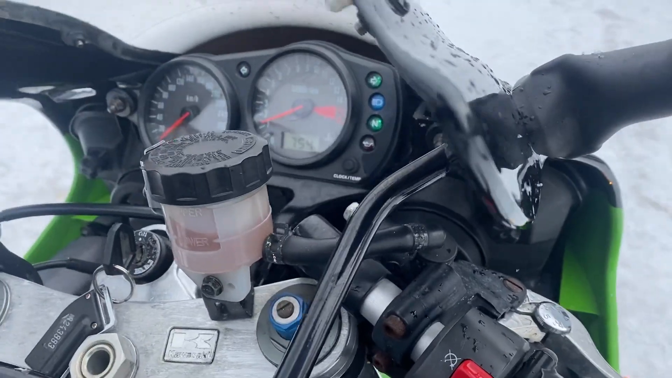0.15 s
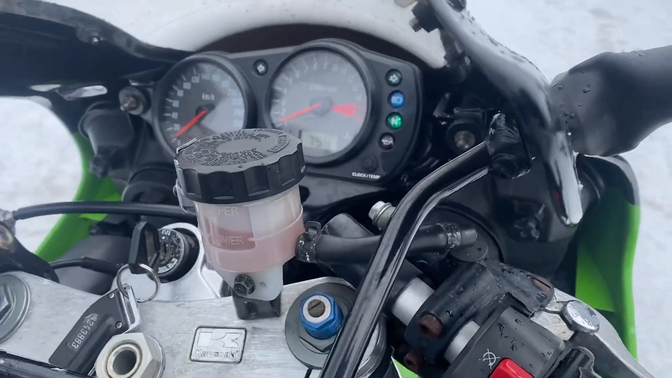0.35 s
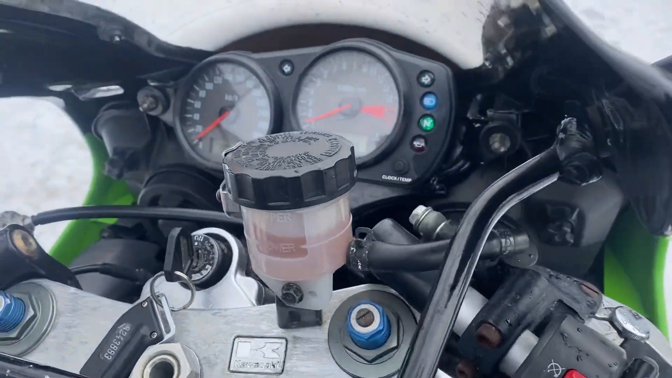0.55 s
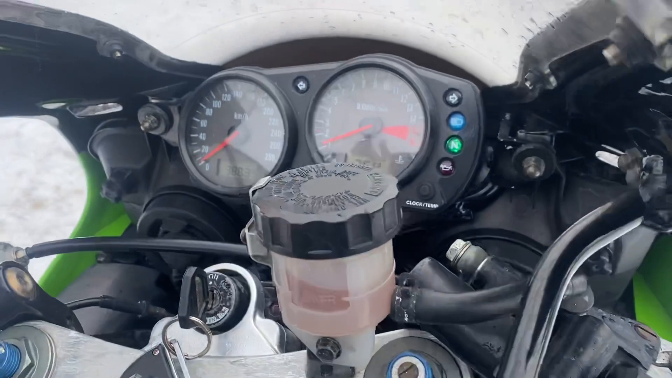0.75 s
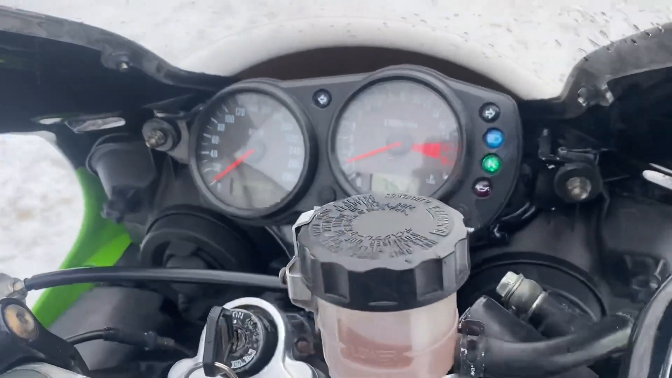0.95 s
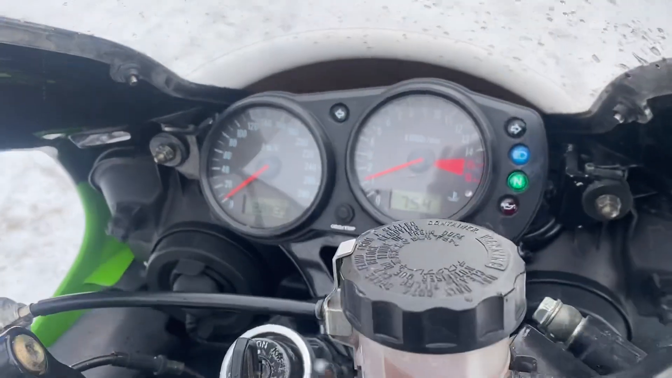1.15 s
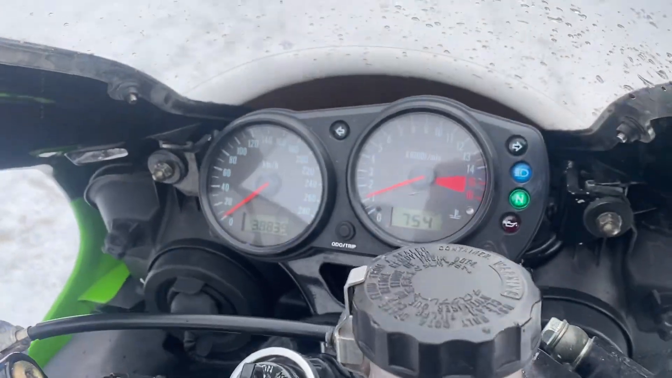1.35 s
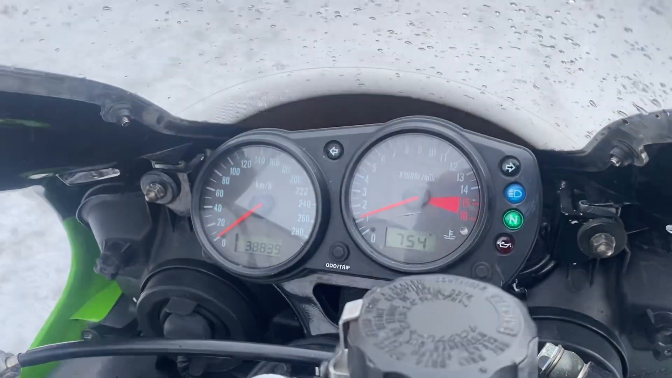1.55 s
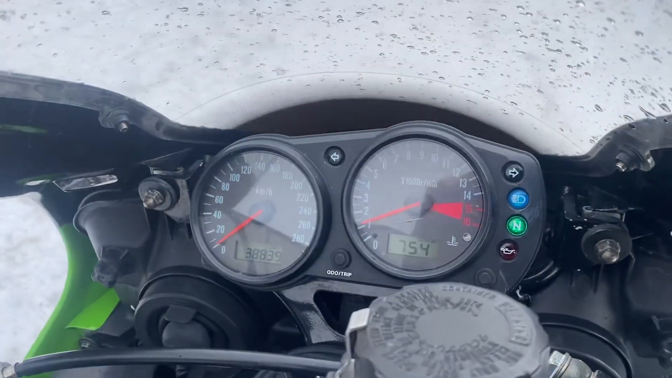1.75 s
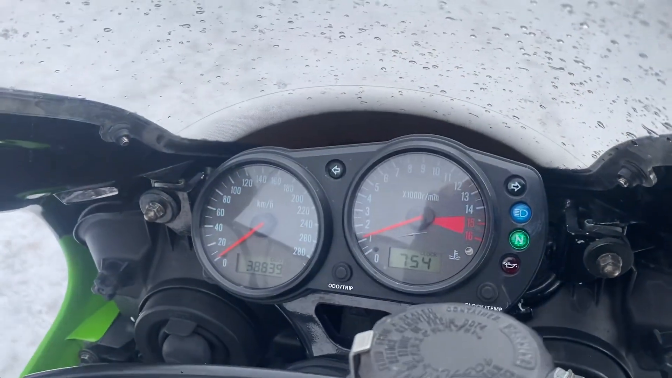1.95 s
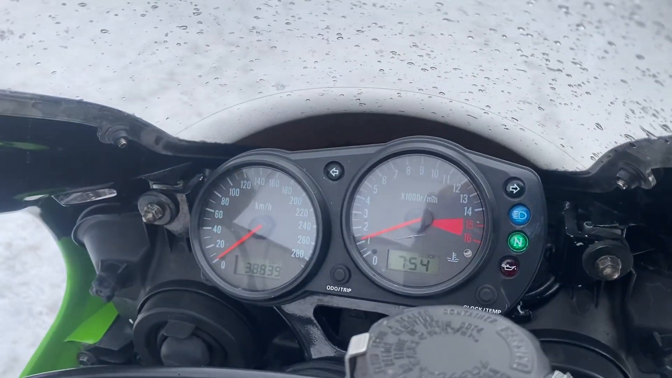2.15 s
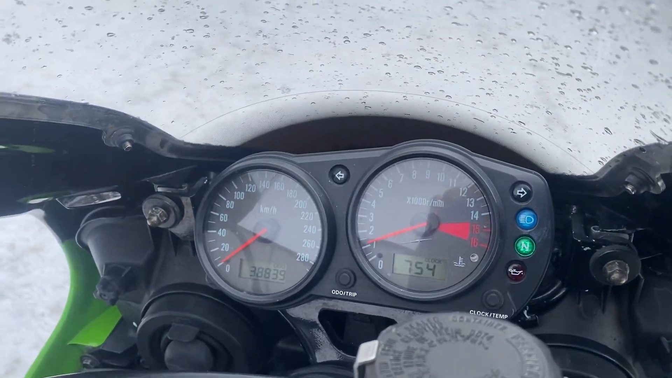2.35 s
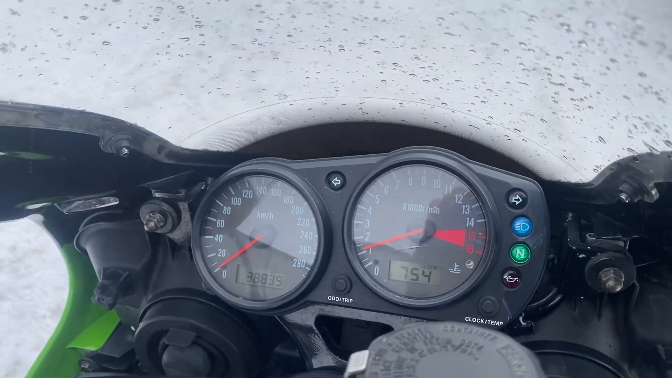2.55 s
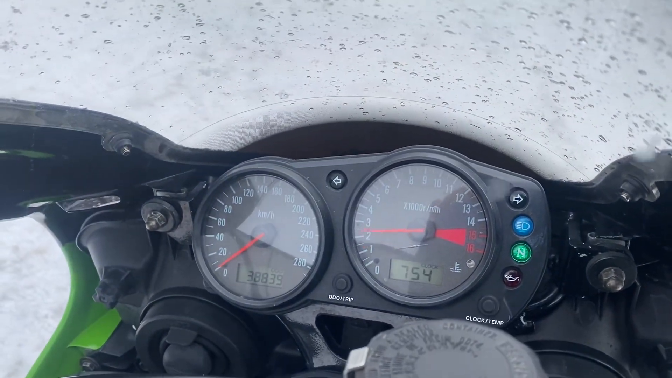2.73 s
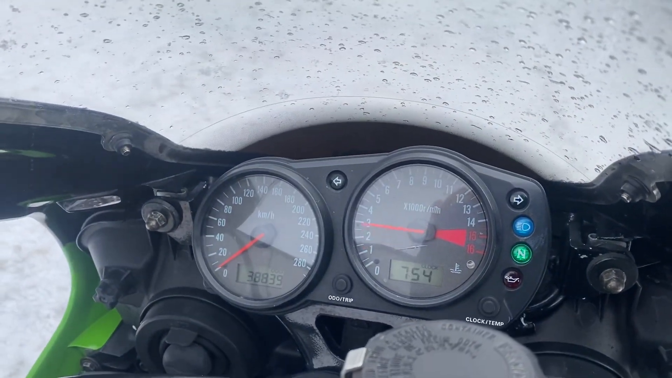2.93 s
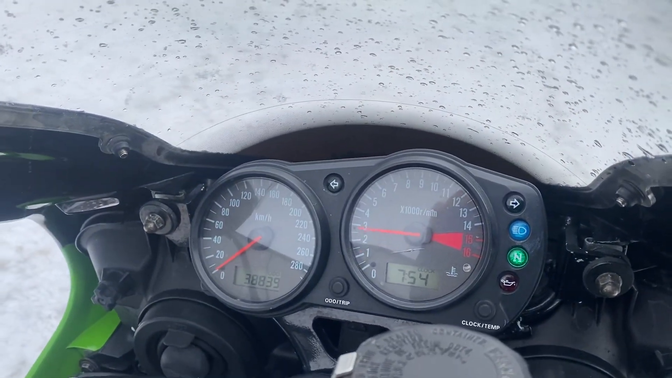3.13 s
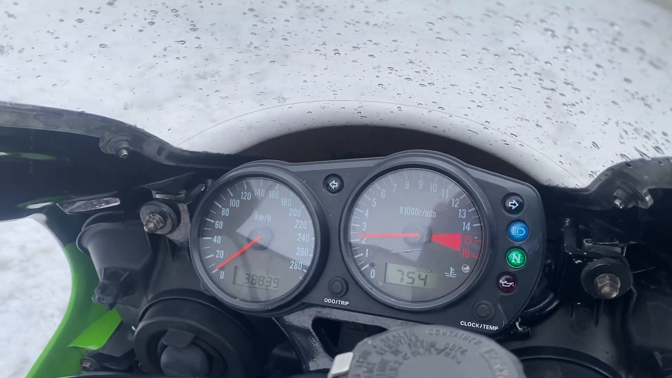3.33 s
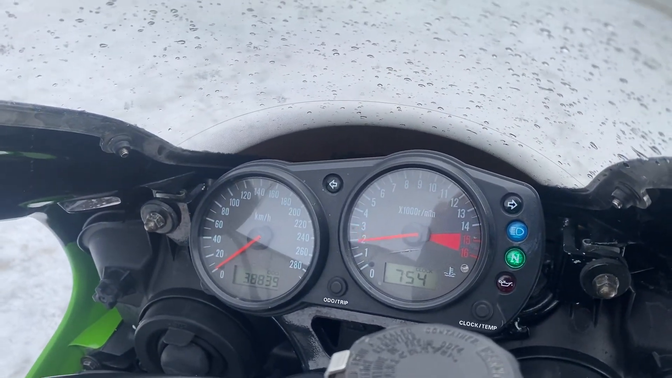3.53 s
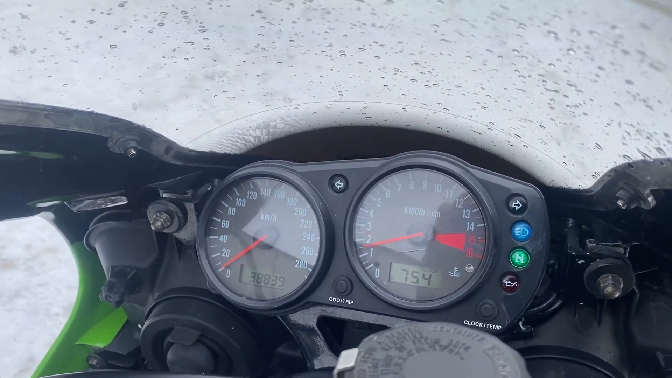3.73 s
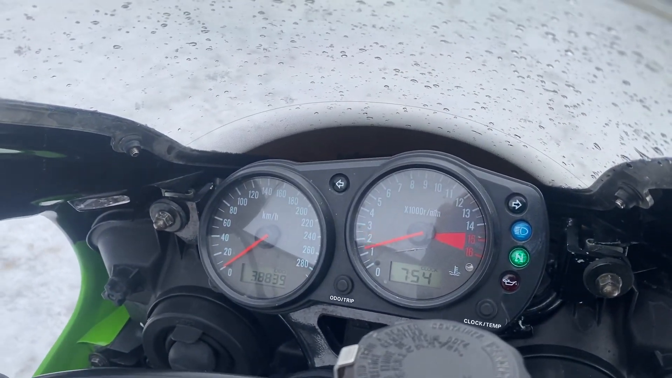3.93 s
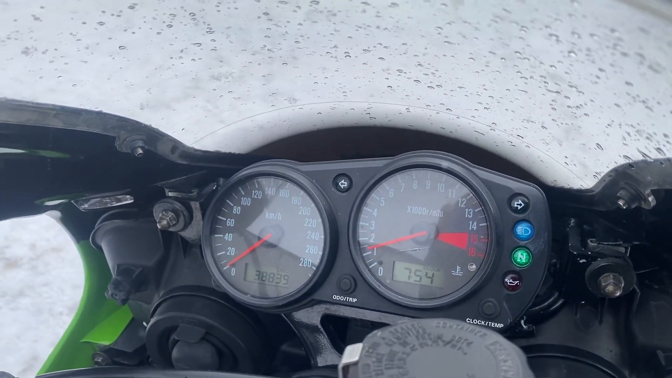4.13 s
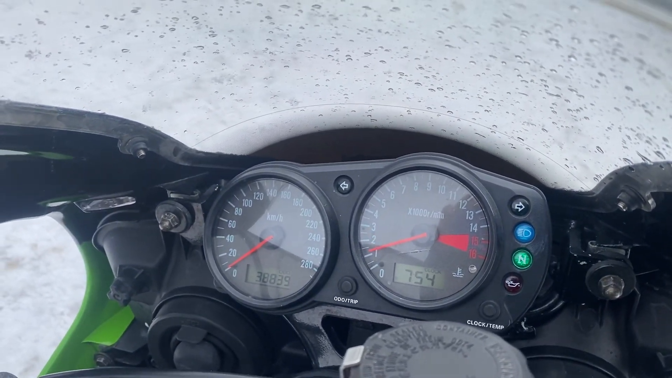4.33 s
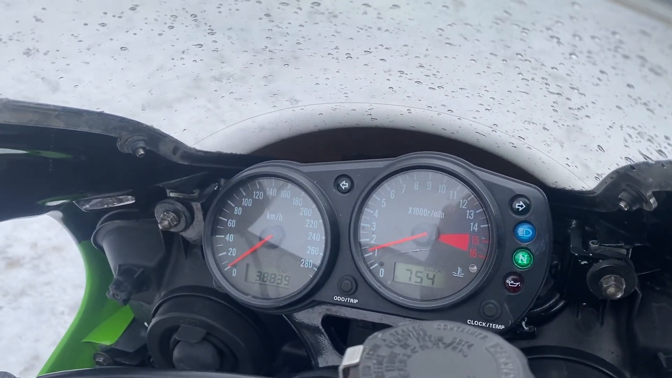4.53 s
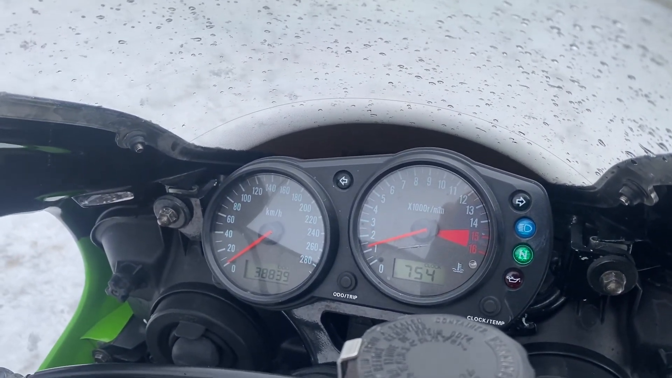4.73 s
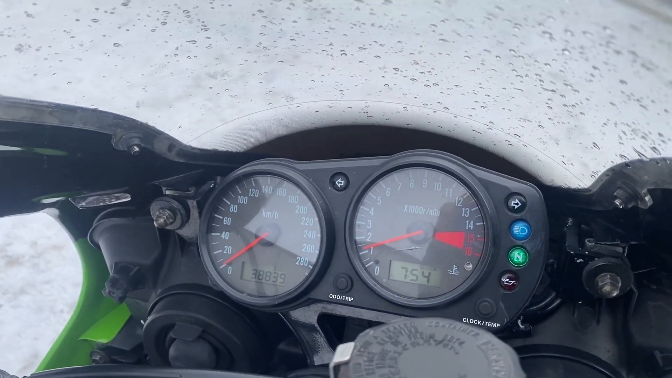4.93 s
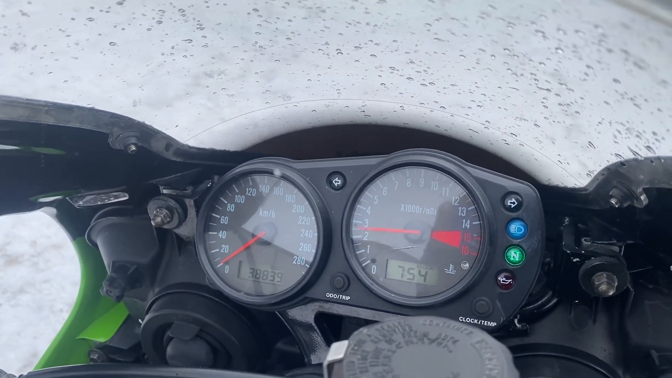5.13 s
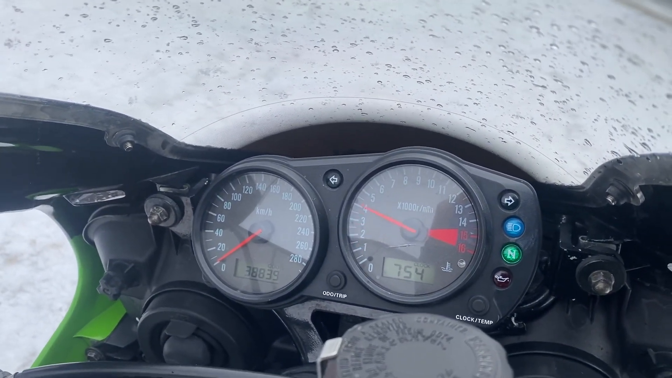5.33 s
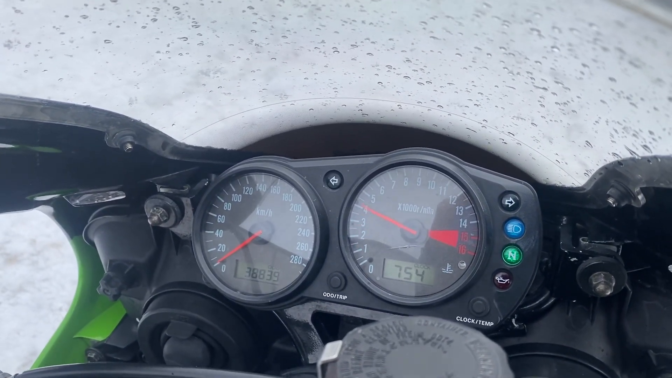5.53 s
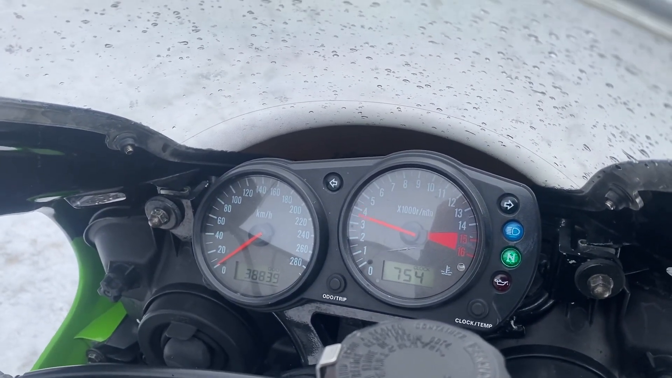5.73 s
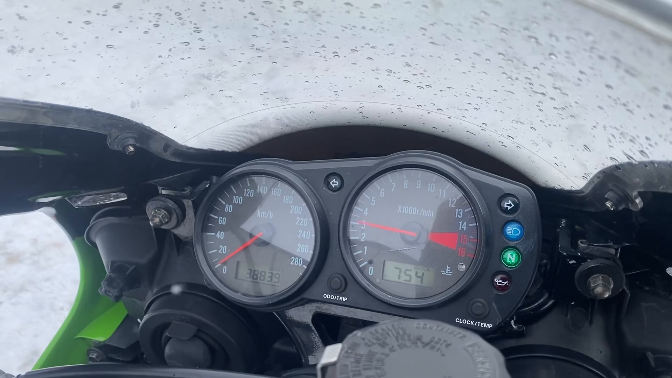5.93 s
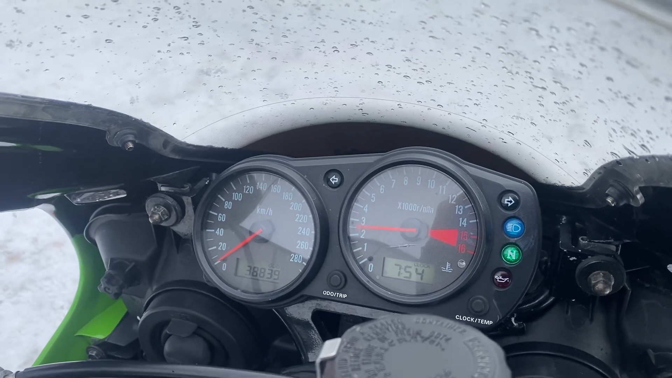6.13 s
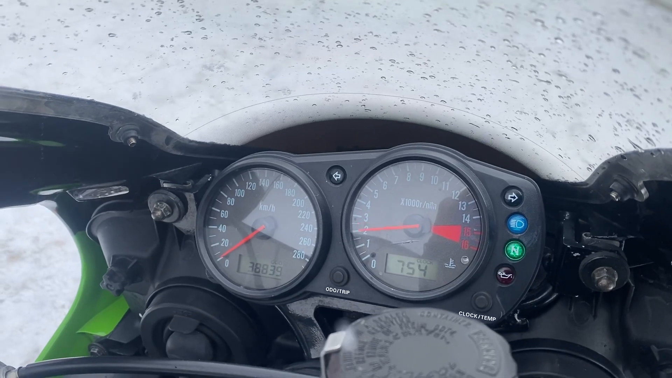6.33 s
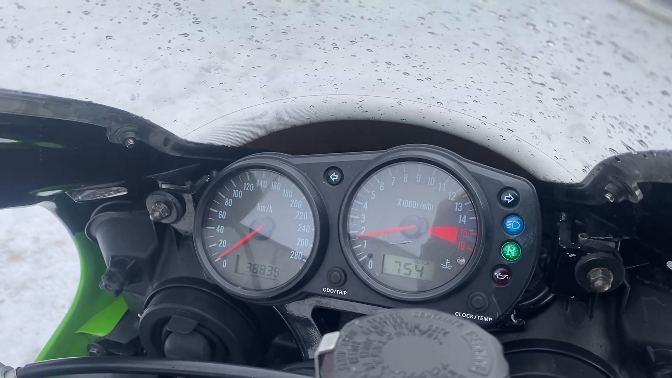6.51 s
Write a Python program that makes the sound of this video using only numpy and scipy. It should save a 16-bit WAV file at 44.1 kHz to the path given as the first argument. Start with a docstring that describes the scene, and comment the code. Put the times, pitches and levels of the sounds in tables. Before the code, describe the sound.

Close by, a cold motorcycle idles with a stumbling beat, gives one short throttle blip, then a bigger rev, and settles again.

```python
"""Motorcycle idling and revving twice

A cold four-cylinder engine idles with an uneven beat and is revved twice, heard over the handlebars.
Each firing gives a low thump and a pulse into the pipes and airbox, which bark when the throttle opens.
Valves clatter and the cam chain sizzles, more so at speed. Behind them are a rumble, a thin tick
and three soft swells of hiss."""
import sys
import numpy as np
from scipy import signal
from scipy.fft import rfft, irfft
from scipy.io import wavfile
from scipy.ndimage import uniform_filter1d

SR = 44100
rng = np.random.default_rng(int(sys.argv[2]) if len(sys.argv) > 2 else 0)


def output_pcm(signal):
    """Save a mono or channel-first signal as 16-bit PCM at the path in sys.argv[1].

    Samples are clipped to [-1, 1] before scaling.
    """
    pcm = np.clip(np.atleast_2d(signal).T, -1, 1) * 32767
    wavfile.write(sys.argv[1], SR, np.round(pcm).astype(np.int16))


N = 289735
TIME = np.arange(N) / SR

# The cylinders in firing order: exhaust_db, valve_tap_db, pipe_delay_s
CYLINDERS = [(-1.5, 3, 0), (-2.5, 0.5, 0), (-2.5, 1.5, 0.0004), (-2, 1, 0.001)]
# Quick twists of the throttle: start_s, held_s, climb_s, top_firings_per_s, coast_s
REVS = [(2.515, .12, .187, 111.3, .963), (4.866, .39, .372, 150.6, 1.212)]


def firing_rate(climb_ease=1.536, coast_ease=1.239):
    """Firings per second: each rev climbs quickly from idle, then friction slows the engine."""
    # The drifting idle speed: time_s, firings_per_s
    idle_points = [(0, 42.73), (.8, 43.18), (1.1, 41.19), (2.4, 43.16), (3.8, 42.77), (4.4, 45.52),
                   (4.85, 42.46), (6.4, 46.67)]
    rate = idle = np.interp(TIME, *np.transpose(idle_points))
    for start, _, climb_s, top, coast_s in REVS:
        climb = 1 - (1 - np.clip((TIME - start) / climb_s, 0, 1)) ** climb_ease
        coast = np.clip(1 - (TIME - start - climb_s) / coast_s, 0, 1) ** coast_ease
        rate = rate + (top - idle) * climb * coast
    return rate


def throttle(lead_s=.056, open_s=.15, shut_s=.08):
    """The throttle, from 0 (shut) to 1 (open); it starts to open just before the engine answers."""
    opening = np.zeros(N)
    for start, held_s, *_ in REVS:
        twist = np.clip((TIME - start + lead_s) / open_s, 0, 1)
        release = np.clip(1 - (TIME - start - held_s) / shut_s, 0, 1)
        opening += twist * release
    return opening


def crank(rate, lead=.11, depth=.91, half_s=.032):
    """Counts firings and gives their push; in a stumble the crank runs ahead, then drops back."""
    # Runs of evenly spaced stumbles in the cold idle: first_s, last_s, count, relative_depth
    stumbles = [(.07, .6, 4, .72), (.735, .735, 1, .55), (.915, 2.26, 8, .72), (2.385, 2.44, 2, .48),
                (3.39, 3.89, 4, .5), (4.06, 4.71, 5, .62), (6.245, 6.47, 3, .5)]
    push, firings = np.ones(N), np.cumsum(rate) / SR
    for first, last, count, relative_depth in stumbles:
        for time_s in np.linspace(first, last, count):
            dip = depth * relative_depth * swell(time_s, half_s)
            push *= 1 - dip
            firings -= 2 * lead * dip * (TIME - time_s) / half_s
    return firings, push


def thump(firings, push, speed, sharpness=1.75, band_hz=(26, 170), boom_hz=(75, 110)):
    """Each firing sends a rounded hump of pressure out of the booming silencer."""
    hump = np.exp(sharpness * (np.cos(2 * np.pi * firings) - 1))
    flow = hump * push * strengths(firings, scatter_db=2.3 - .7 * speed)
    lows = signal.sosfiltfilt(signal.butter(2, band_hz, "band", fs=SR, output="sos"), flow)
    ring = signal.sosfiltfilt(signal.butter(1, boom_hz, "band", fs=SR, output="sos"), flow)
    return levelled(lows + .45 * ring)


def boom(rate, centre_hz=92, width_hz=22, lift_db=2):
    """The thump swells as the firing rate passes the pitch at which the silencer rings."""
    return amp(lift_db / (1 + (2 * (rate - centre_hz) / width_hz) ** 2))


def gas(firings, rate, rough, jitter, soft_hz):
    """Each firing gives a soft pulse and a noisy puff; pipes of unequal length make them growl."""
    delay_s = np.array(CYLINDERS)[np.round(firings).astype(int) % len(CYLINDERS), 2]
    pulses = levelled(clicks(firings + .078 - delay_s * rate, jitter))
    pulses = signal.sosfilt(signal.butter(2, soft_hz, fs=SR, output="sos"), pulses)
    swirl = levelled(puffs(firings + .074, length=1.0, floor=.56))
    return ((1 - rough) * pulses + rough * swirl) * strengths(firings, scatter_db=1.2)


def pipes(firings, push, rate, speed, opening, howl_db=4.5):
    """The gas rings the pipes, more cleanly at speed; an open throttle lets the airbox howl."""
    # Tone of pipes and airbox, throttle shut and open: pitch_hz, level_db
    shut_tone = [(150, -7), (200, -1), (280, -5), (400, -5.5), (490, -4.5), (560, -7.5), (700, -11.5),
                 (900, -17), (1200, -25)]
    open_tone = [(150, -4.5), (230, 4), (305, -3.5), (380, 5.5), (470, -0.5), (570, -7), (690, -4),
                 (850, -9), (1200, -16)]
    # Where they ring: pitch_hz, width_hz, shut_db, open_db
    rings = [(210, 36, 3, 4), (257.2, 25, 6.5, 5.5), (326.2, 43.5, 12.5, 11.5), (445.6, 22, 4, 14.5),
             (483, 31, 9, 6.5), (600, 36, 5.5, 8.5), (810, 130, -9.5, 16), (893, 72, 6.5, -6)]
    coasting = gas(firings, rate, rough=.63 * (1 - .58 * speed ** .5), jitter=.016, soft_hz=380)
    coasting *= (push + .02) ** .55
    pulling = gas(firings, rate, rough=.48 - .39 * speed, jitter=.015, soft_hz=660)
    burble = levelled(body(coasting, shut_tone, np.delete(rings, 3, axis=1)))
    howl = levelled(body(pulling, open_tone, np.delete(rings, 2, axis=1)))
    airflow = np.clip(opening * speed, 0, 1)
    return np.sqrt(1 - airflow) * burble + np.sqrt(airflow) * amp(howl_db) * howl


def clatter(firings, push):
    """Valves tap the engine cases at each firing; slack gears knock in between."""
    # Tone of the cases: pitch_hz, level_db
    tone = [(700, -2.5), (900, -1.5), (1080, -8.5), (1400, -9.5), (2000, -7.5), (2700, -15), (3100, -16.5),
            (4000, -21)]
    # Where they ring: pitch_hz, width_hz, lift_db
    rings = [(939, 150, 2.6), (1158, 53, 6.2), (1475, 170, 6.5), (1712, 71, 6.1), (2155, 58, 5),
             (2443, 95, 5), (2673, 97, 5.9)]
    taps = clicks(firings - .08, jitter=.0497) * strengths(firings, scatter_db=2.5, metal=True)
    valves = levelled(echoes(taps, share=1.0, span_s=.006))
    knocks = clicks(3 * firings, jitter=.3) * strengths(3 * firings, scatter_db=4, metal=True)
    scrape = puffs(firings, length=.69, floor=.58) * strengths(firings, scatter_db=1, metal=True) ** .68
    drive = (.36 * valves + .29 * levelled(knocks) + levelled(scrape)) * (push + .063) ** .36
    return levelled(body(drive, tone, rings))


def chain(firings, push, links_per_firing=9):
    """Chain links and gear teeth sizzle, tugged by each cam that lifts a valve."""
    # Tone of chain and gears: pitch_hz, level_db
    tone = [(2500, -7), (3100, -8.5), (4400, -5), (5900, -5), (6800, -3), (7900, -3.5), (8500, -6),
            (9500, -10), (12000, -13.5), (15500, -15)]
    # Where they ring: pitch_hz, width_hz, lift_db
    rings = [(3466, 130, 3), (3795, 150, 9), (4005, 60, 3), (4715, 110, 3.5), (5103, 170, 4), (6500, 90, 3),
             (6739, 130, 4.5), (7342, 110, 4.5), (7530, 110, 3.5), (7830, 200, 5.5), (8118, 90, 4),
             (8871, 170, 3.5), (11000, 250, 2), (12876, 150, 4.5)]
    links = links_per_firing * firings
    teeth = levelled(clicks(links, jitter=.2) * strengths(links, scatter_db=1.5, metal=True))
    rub = levelled(puffs(firings - .1, length=.48, floor=1.4))
    drive = (.61 * teeth + rub) * (push + .05) ** .42
    return levelled(body(echoes(drive, share=.3, span_s=.02), tone, rings))


def shake(firings, push, speed, drone_hz=91, width_hz=18, idle_db=-43, rev_db=-26):
    """The engine shakes the body panels into a rumble that grows with speed."""
    knocks = puffs(firings, length=.78, floor=.77) * push
    rumble = body(knocks, tone=[(36, 0), (55, -1.5), (110, -3)], rings=[(drone_hz, width_hz, 5)])
    return (amp(idle_db) + amp(rev_db) * speed) * levelled(rumble)


def tick(firings, fade_s=.004, level_db=-64):
    """A thin, bright tick every fourth firing, as from the nearest fuel injector."""
    t = TIME[:SR // 50]
    snap = rng.standard_normal(len(t)) * np.exp(-t / fade_s)
    beats = clicks((firings - 2.1) / 4, jitter=.006) * strengths(firings, scatter_db=2.5, metal=True)
    snaps = signal.oaconvolve(beats, snap)[:N]
    sound = body(snaps, tone=[(3000, -10), (9000, -5), (13000, -3), (15500, 18)])
    return amp(level_db) * sound / np.std(sound)


def hiss(grain_hz=90):
    """Swells of hiss, each a band of noise with airy treble above it."""
    # The swells: peak_s, half_length_s, pitch_hz, width_hz, band_db, air_db
    swells = [(.17, .26, 4770, 220, -52.5, -65), (.74, 0.32, 4230, 2010, -50.5, -55.5),
              (2.07, 0.3, 4570, 650, -54.5, -51.5)]
    # Tone of the airy treble: pitch_hz, level_db
    air_tone = [(6000, -2), (9000, 2), (12000, -5), (15000, -6)]
    air = levelled(body(rng.standard_normal(N), air_tone))
    sound = np.zeros(N)
    for peak_s, half_s, pitch_hz, width_hz, band_db, air_db in swells:
        # the faster the phase wanders, the wider the band
        wander = np.cumsum(np.sqrt(np.pi * width_hz / SR) * rng.standard_normal(N))
        grain = signal.sosfilt(signal.butter(2, grain_hz, fs=SR, output="sos"), rng.standard_normal(N))
        band = levelled(grain * np.cos(2 * np.pi * pitch_hz * TIME + wander))
        sound += swell(peak_s, half_s) * (amp(band_db) * band + amp(air_db) * air)
    return sound


def echoes(x, share, span_s, count=24):
    """Adds quick echoes between the tank, body panels and windscreen."""
    delay, sign = rng.random(count), rng.choice([-1, 1], count)
    taps = np.zeros(int(span_s * SR) + 1)
    taps[(delay * span_s * SR).astype(int)] = sign * np.exp(-delay)
    return x + share * signal.oaconvolve(x, taps / np.linalg.norm(taps))[:N]


def body(x, tone, rings=(), size=8192):
    """Shapes x with a broad tone (pitch_hz, level_db) and rings (pitch_hz, width_hz, lift_db)."""
    hz = np.fft.rfftfreq(size, 1 / SR)
    pitch_hz, level_db = np.transpose(tone)
    db = np.interp(np.log(hz + 1), np.log(pitch_hz), level_db)
    octaves_outside = np.log2(np.maximum(np.maximum(pitch_hz[0] / (hz + 1), hz / pitch_hz[-1]), 1))
    db -= 24 * octaves_outside
    db += sum(lift / (1 + (2 * (hz - centre) / width) ** 2) for centre, width, lift in rings)
    # build the filter so that ringing comes after each hit, never before it
    cepstrum = irfft(np.log(amp(np.maximum(db, -100))))
    cepstrum[1:size // 2] *= 2
    cepstrum[size // 2 + 1:] = 0
    response = irfft(np.exp(rfft(cepstrum)))[:size // 2]
    return signal.oaconvolve(x, response)[:N]


def strengths(count, scatter_db, metal=False):
    """Strength of each beat: the cylinders' exhaust (or metal tap) levels in turn, plus chance."""
    beat = np.round(count).astype(int)
    own_db = np.array(CYLINDERS)[beat % len(CYLINDERS), 1 if metal else 0]
    return amp(own_db + scatter_db * rng.standard_normal(N)[beat])


def clicks(count, jitter):
    """One click at each whole count, early or late by a random share of a beat."""
    nearest = np.round(count).astype(int)
    late = np.clip(jitter * rng.standard_normal(N)[nearest], -.45, .45)
    passed = nearest + (count - nearest > late)
    return np.maximum(np.diff(passed, prepend=passed[0]), 0).astype(float)


def puffs(count, length, floor):
    """Noise that flares at each whole count and fades towards a floor; length is in beats."""
    return (floor + np.exp(-(count % 1) / length)) * rng.standard_normal(N)


def loudness(levels, rate, pull, idle_rate=43):
    """A part grows louder with engine speed, and more while the engine pulls."""
    idle_db, doubling_db, pull_db = levels
    return amp(idle_db + doubling_db * np.log2(rate / idle_rate) + pull_db * pull)


def levelled(x, size=8200):
    """Evens out slow changes in loudness and keeps the quick beats."""
    power = uniform_filter1d(uniform_filter1d(x ** 2, size), size // 2)
    return x / np.sqrt(power + 1e-12)


def swell(peak_s, half_s):
    """A smooth rise and fall around peak_s."""
    return np.exp(-((TIME - peak_s) / half_s) ** 2)


def amp(db):
    """Turns decibels into a gain."""
    return 10 ** (np.asarray(db) / 20)


def scene(rattle_db=6.0, whirr_db=1.5, pull_fade=.88):
    """One crank drives every engine part; near top speed the valves and chain grow harsher."""
    # Loudness of each part: idle_db, speed_doubling_db, full_pull_db
    thump_levels = (-27.3, 3, 7.5)
    pipe_levels = (-35, 6.5, 9)
    clatter_levels = (-42.5, 4, 7)
    chain_levels = (-50, 9, 3.5)
    rate, opening = firing_rate(), throttle()
    firings, push = crank(rate)
    speed = (rate - rate.min()) / np.ptp(rate)  # 0 slowest, 1 fastest
    torque = 1 - pull_fade * speed
    pull, early_pull = opening * torque, np.sqrt(opening) * torque  # thump and chain answer first
    exhaust = loudness(thump_levels, rate, early_pull) * boom(rate) * thump(firings, push, speed)
    exhaust += loudness(pipe_levels, rate, pull) * pipes(firings, push, rate, speed, opening)
    metal = loudness(clatter_levels, rate, pull) * amp(rattle_db * speed ** 2) * clatter(firings, push)
    metal += loudness(chain_levels, rate, early_pull) * amp(whirr_db * speed ** 2) * chain(firings, push)
    # The metal sounds dip briefly: time_s, half_length_s, level_db
    dip = (1.48, 0.33, -1.3)
    dip_s, half_s, dip_db = dip
    metal *= amp(dip_db * swell(dip_s, half_s))
    return (exhaust + metal + shake(firings, push, speed) + tick(firings) + hiss())[None]


def record(dry, edge_hz=15800):
    """Cuts away the very highest treble."""
    low_pass = signal.firwin(511, edge_hz, window=("kaiser", 9), fs=SR)
    return signal.oaconvolve(dry, low_pass[None], "same")


dry = scene()
out = record(dry)
output_pcm(out)
```